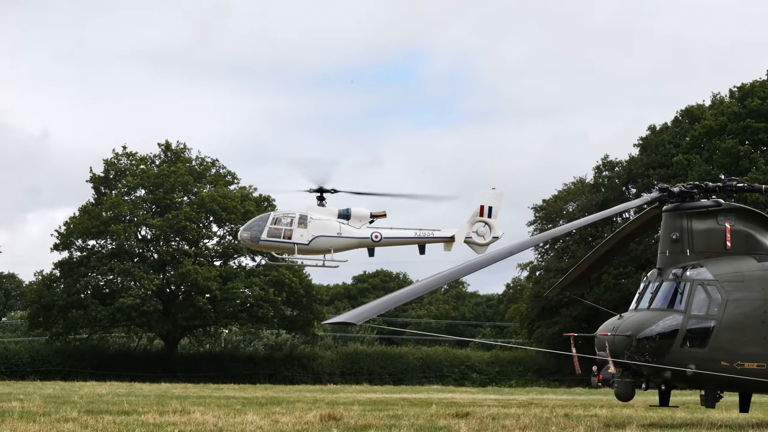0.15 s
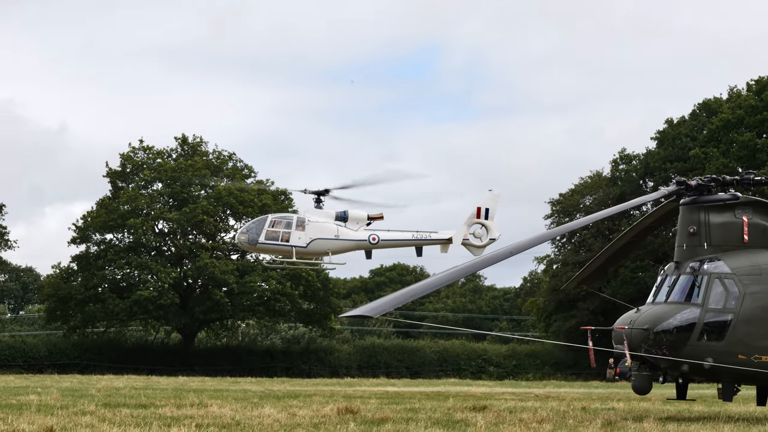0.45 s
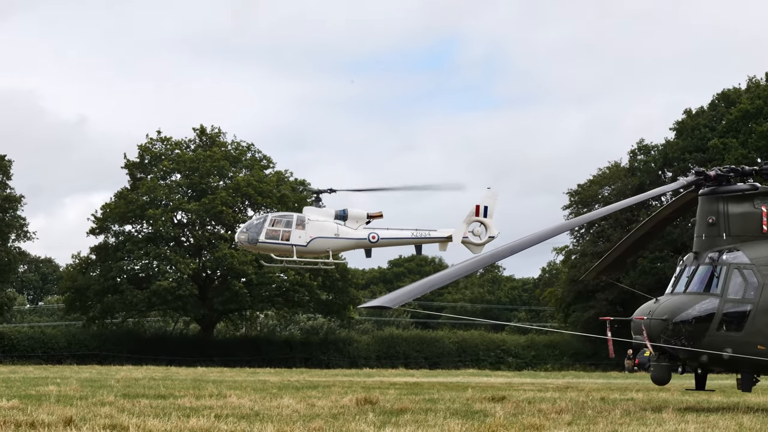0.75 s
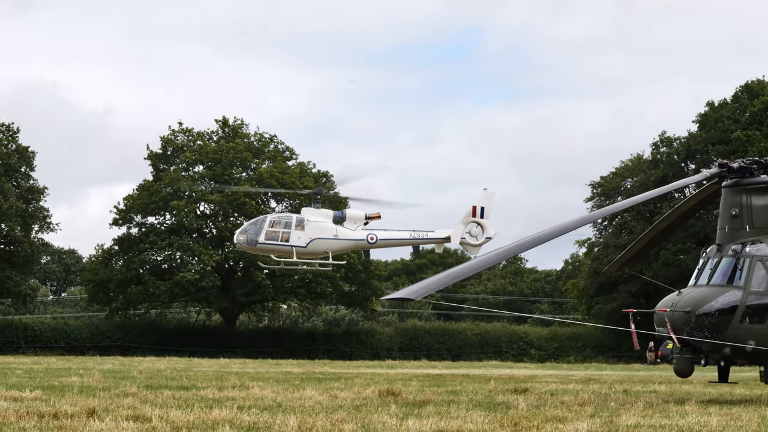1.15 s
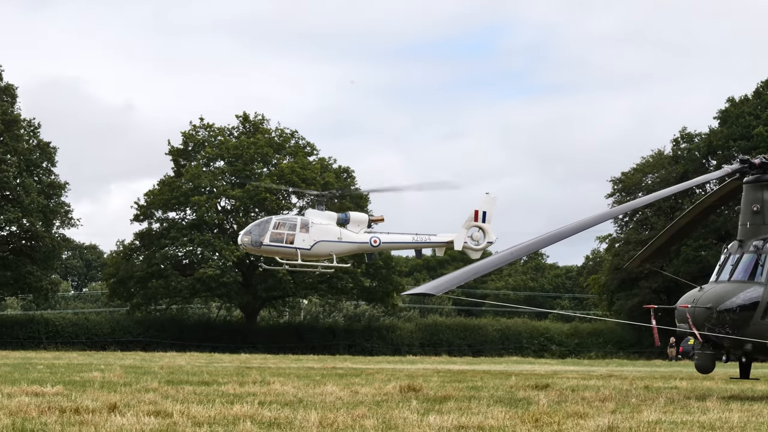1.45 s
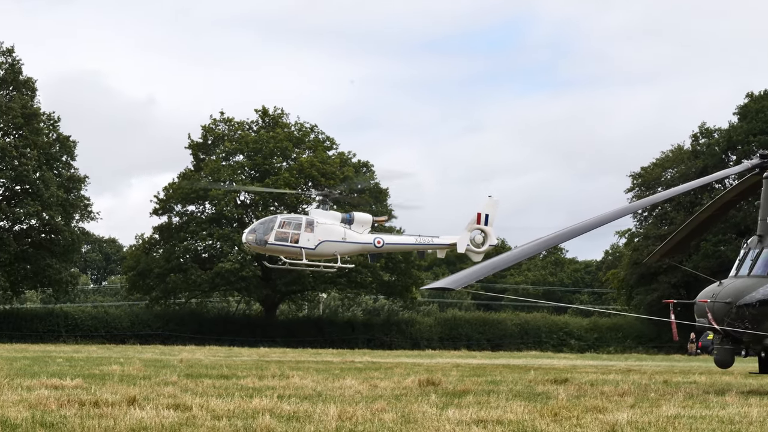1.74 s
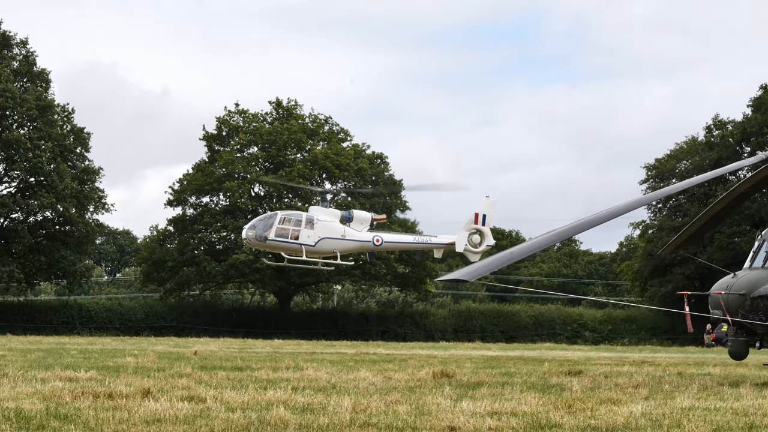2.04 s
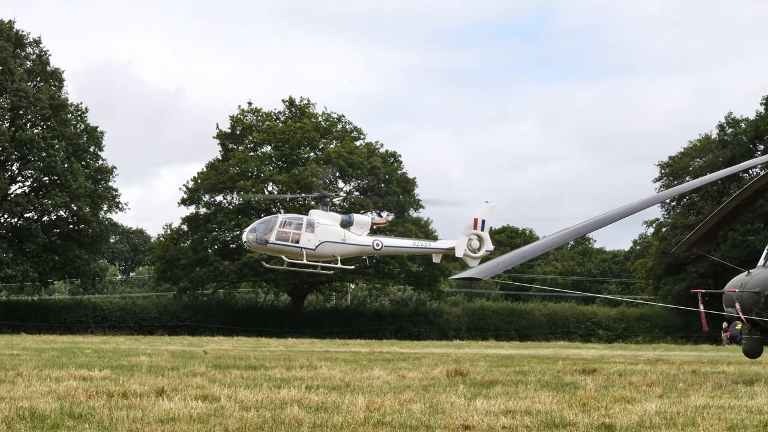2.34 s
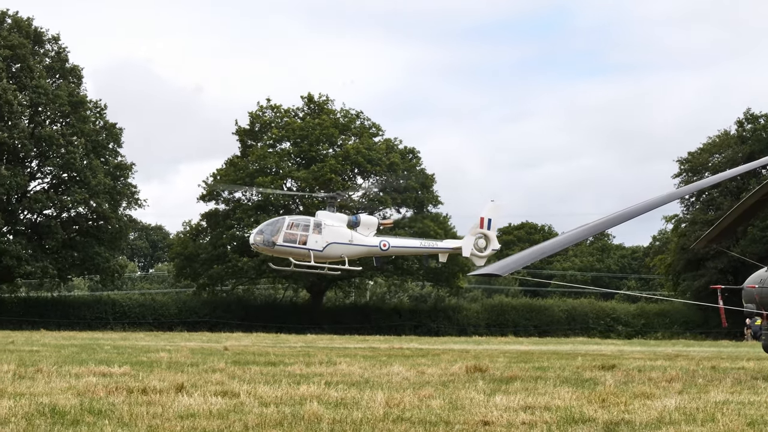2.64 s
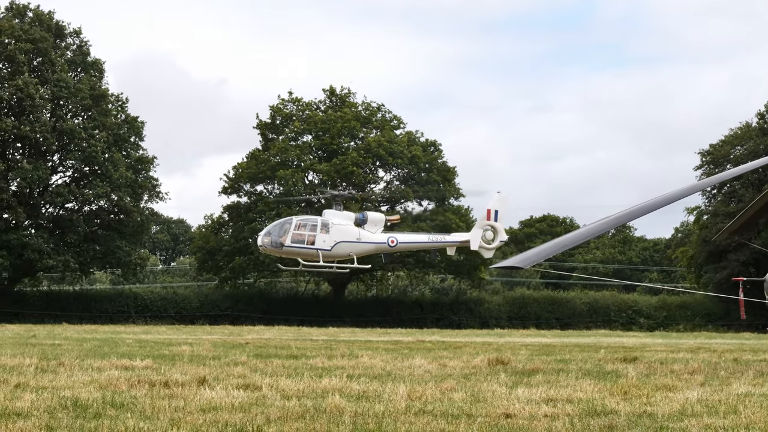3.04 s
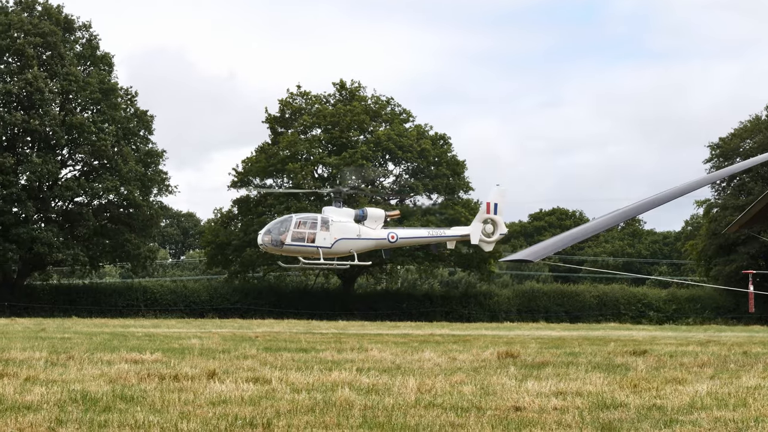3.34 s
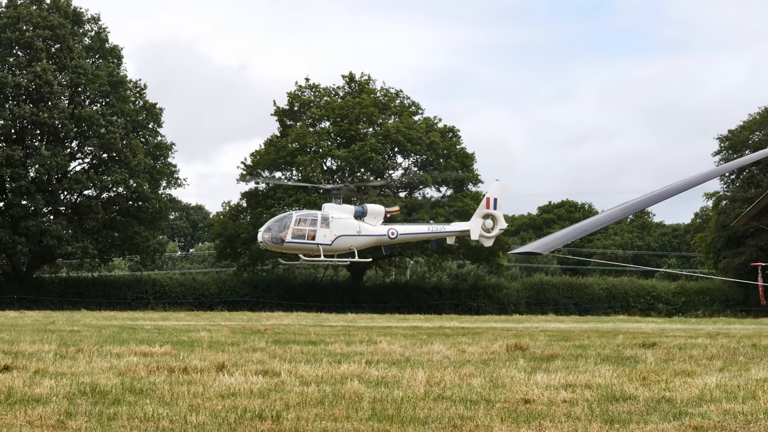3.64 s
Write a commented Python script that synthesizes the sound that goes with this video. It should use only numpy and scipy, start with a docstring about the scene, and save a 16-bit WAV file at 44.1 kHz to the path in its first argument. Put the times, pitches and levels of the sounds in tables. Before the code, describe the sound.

Outdoors, a microphone across a field hears one hovering helicopter: a few loud hollow cracks at the start, fast rotor thumping, warbling tail-fan buzz, then softer roar beneath a piercing, unsteady compressor whine.

```python
"""A ducted tail fan sings and rasps as it bites turbulent air: a light turbine helicopter, low over grass.
It drifts slowly past: exhaust roar swishes, three main blades thump, and a few hollow slaps ring out.
The compressor whines near 8 kHz, fluttering as the downwash scatters it and glinting off the blades.
Tones are sines of turning parts with random fading; roar and hiss are shaped noise; slaps are short pulses.
The microphone stands across the field; its signal is limited and loses the extreme treble."""
import sys
import numpy as np
from scipy import signal
from scipy.fft import rfft, irfft
from scipy.io import wavfile
from scipy.ndimage import uniform_filter1d, minimum_filter1d

SR = 44100
rng = np.random.default_rng(int(sys.argv[2]) if len(sys.argv) > 2 else 0)


def master(y):
    """Save y as 16-bit WAV."""
    cut = np.clip(np.atleast_2d(y).T, -1, 1)
    pcm = np.round(cut * 32767)  # scale
    wavfile.write(sys.argv[1], SR, pcm.astype(np.int16))


N = 167139
TIME = np.arange(N) / SR
BLADE_HZ, FIRST_BLADE_S = 18.82, .0135  # main blades passing, and the first passage


def from_db(db):
    """Decibels to amplitude gain."""
    return 10 ** (np.asarray(db) / 20)


def rms_one(x):
    """Scale to unit power."""
    return x / np.sqrt(np.mean(np.abs(x) ** 2) + 1e-20)


def in_time(rows):
    """Each column of a curve, interpolated at every sample."""
    s, *columns = np.transpose(rows)
    return [np.interp(TIME, s, c) for c in columns]


def turning(hz):
    """Phase angle of something that turns at a changing rate."""
    return 2 * np.pi * np.cumsum(hz) / SR


def coloured(gain_at):
    """Unit-power noise whose spectrum follows a gain function of frequency."""
    spectrum = rfft(rng.standard_normal(4 * SR))
    hz = np.arange(2 * SR + 1) / 4  # four seconds of noise: bins 1/4 Hz apart
    return rms_one(irfft(spectrum * gain_at(hz))[:N])


def noise(spectrum):
    """Unit-power noise with a tabled spectrum, interpolated over log frequency."""
    hz, db = np.transpose(spectrum)
    return coloured(lambda f: from_db(np.interp(np.log(f + 1), np.log(hz), db)))


def drift(rate_hz):
    """Random wander of unit power, mostly slower than the given rate."""
    return coloured(lambda f: 1 / (1 + (f / rate_hz) ** 2))


def scatter(rate_hz):
    """Random strength and phase of a tone that has crossed turbulent air."""
    return rms_one(drift(rate_hz) + 1j * drift(rate_hz))


def tone(angle, strength):
    """A sine of unit power, times a strength that may shift its phase too."""
    return np.sqrt(2) * np.real(strength * np.exp(1j * angle))


def fading(share, rate_hz):
    """A direct path mixed with a power share of scattered sound."""
    share = np.clip(share, 0, 1)
    return np.sqrt(1 - share) + np.sqrt(share) * scatter(rate_hz)


def since_blade(lag_s):
    """Signed time in seconds from the nearest blade passage, delayed by a lag."""
    turns = (TIME - FIRST_BLADE_S - lag_s) * BLADE_HZ
    return ((turns + .5) % 1 - .5) / BLADE_HZ


def chop(lag_s, width_s, depth):
    """A swell at each blade passage, randomly uneven; unit power."""
    uneven = from_db(3.2 * drift(12))
    swell = np.exp(-.5 * (since_blade(lag_s) / width_s) ** 2)
    return rms_one(1 + depth * uneven * swell)


def tail_fan():
    """Clean blade-rate harmonics, each with a rough warbling hump just below it."""
    # blade rate: t/s, f/Hz
    fan_speed = [(0, 1252), (.5, 1249), (.8, 1245), (1.3, 1246), (2.1, 1243), (2.7, 1247), (3.3, 1246),
                 (3.79, 1249)]
    # base levels: t/s, tone level/dB, rasp level/dB
    fan_levels = [(0.0, -17.5, -18), (0.07, -25, -26.5), (0.24, -21.5, -26), (0.39, -37, -26),
                  (0.53, -18, -19.5), (0.75, -14.5, -14), (0.78, -24, -14.5), (0.92, -11, -13.5),
                  (0.95, -21, -14), (1.1, -15.5, -22), (1.33, -22, -25), (1.45, -40, -26),
                  (1.48, -27.5, -23.5), (2.45, -29.5, -25.5), (2.68, -20, -24.5), (2.8, -32, -25.5),
                  (2.84, -24, -37), (3.35, -25, -31), (3.45, -30, -39), (3.55, -18.5, -37),
                  (3.77, -28, -39), (3.79, -26, -28)]
    # base level of the clean overtones, which beam differently: t/s, level/dB
    overtone_levels = [(0.0, -37), (0.05, -34), (0.23, -46), (0.85, -30.5), (1.15, -42), (1.27, -34.5),
                       (2.07, -37.5), (2.09, -42.5), (2.67, -32.5), (3.24, -49), (3.44, -30.5), (3.5, -42),
                       (3.58, -32.5), (3.68, -39), (3.74, -31), (3.79, -41)]
    # offsets of each harmonic: multiple of the blade rate, tone level/dB, rasp level/dB
    fan_harmonics = [(1, 2, -0.5), (2, 2, -13), (3, -0.5, -13.5), (4, -8, -13), (5, -22, -20.5)]
    rasp_hz, rasp_width_hz, rasp_warble_hz = 1195, 50, 21.93  # the width grows with the harmonic
    angle = turning(in_time(fan_speed)[0]) + 0.37 * drift(8)
    tone_db, rasp_db = in_time(fan_levels)
    overtone_db, = in_time(overtone_levels)
    rasp_angle = turning(rasp_hz + rasp_warble_hz * drift(45.03))
    out = 0
    for k, clean_db, rough_db in fan_harmonics:
        k = round(k)
        level = tone_db if k == 1 else overtone_db
        clean = tone(k * angle, fading(share=0.12 * k, rate_hz=28))
        rasp = tone(k * rasp_angle, scatter(rasp_width_hz * np.sqrt(k)))
        out = out + from_db(level + clean_db) * clean
        out = out + from_db(rasp_db + rough_db) * rasp
    return out


def roar():
    """Exhaust, rotor wash and the whine's noisy skirt: three noise bands that swish with the blades."""
    # rise and fall of each band, centred on its mean below: t/s, level/dB
    low_curve = [(0, -20.5), (.4, -22), (.9, -20), (1.35, -22), (2.1, -23.5), (2.7, -24), (3.0, -27),
                 (3.79, -28)]
    middle_curve = [(0.0, -31.5), (0.5, -31), (0.64, -26.5), (1.16, -23.5), (1.27, -27), (2.75, -27.5),
                    (2.8, -30.5), (3.77, -29), (3.79, -27)]
    hiss_curve = [(0.0, -36), (0.01, -42), (0.37, -41.5), (0.91, -33), (1.0, -41), (1.95, -34),
                  (2.0, -37.5), (3.79, -39.5)]
    # spectral shape of each noise band; the hiss's bump near 8 kHz is the compressor whine's
    # noisy skirt: f/Hz, density level/dB
    low_spectrum = [(35, -24), (70, -8), (110, -9.5), (160, -8), (260, -7.5), (375, -2.5), (430, -5.5),
                    (520, 2.5), (620, 1.5), (780, 1), (1000, -1.2), (1250, -7), (1700, -22), (3000, -45)]
    middle_spectrum = [(700, -17), (1100, -5), (1350, -0.5), (1650, -2), (2100, -7.5), (2850, -11.5),
                       (3500, -13), (5000, -16), (8000, -39)]
    hiss_spectrum = [(1800, 1.5), (3000, -8.5), (3600, 6.5), (4400, -0.5), (5300, 1.5), (6100, 2.5),
                     (6800, -3.5), (7700, 6), (8400, 6.5), (9200, -4), (10000, -5), (11000, -16),
                     (12500, -12.5), (15500, -27)]
    low_db, middle_db, hiss_db = -23, -25.5, -27  # mean levels
    low_swing, middle_swing, hiss_swing = (
        curve - curve.mean() for curve in (in_time(rows)[0] for rows in (low_curve, middle_curve, hiss_curve)))
    low = noise(low_spectrum) * chop(lag_s=0.00057, width_s=0.0023, depth=0.69)
    middle = noise(middle_spectrum) * chop(lag_s=0, width_s=0.014, depth=0.34)
    hiss = noise(hiss_spectrum) * chop(lag_s=0.0094, width_s=0.002, depth=0.44)
    hiss_flicker_db = 2.0 * drift(34)
    return (from_db(low_db + low_swing) * low
            + from_db(middle_db + middle_swing) * middle
            + from_db(hiss_db + hiss_swing + hiss_flicker_db) * hiss)


def main_rotor():
    """Each blade sends a push and then a pull of pressure, built from blade-rate harmonics."""
    # thump before its offset and wander: t/s, level/dB
    thump_curve = [(0.0, -35), (1.83, -37), (2.07, -46), (2.12, -39), (3.64, -38.5), (3.79, -39)]
    # relative strength of the harmonics: multiple of the blade rate, level/dB
    thump_orders = [(2, -0.5), (3, 5), (4, -7.5), (5, -1), (6, 2.5), (7, -13), (8, -6), (9, -20), (10, -13)]
    thump_offset_db, thump_lag_s = -1.5, -0.0013
    angle = 2 * np.pi * BLADE_HZ * since_blade(thump_lag_s)
    pulses = sum(-from_db(db) * np.sin(round(k) * angle) for k, db in thump_orders)
    wander_db = 1.1 * drift(6)
    return from_db(in_time(thump_curve)[0] + thump_offset_db + wander_db) * rms_one(pulses)


def slaps():
    """Short hollow cracks as the rotor meets its own wake, doubled by the ground."""
    # each slap, its envelope peak ahead of the low cut: t/s, level/dB
    slap_times = [(.0698, -4), (.1222, -9), (.174, -16), (2.141, -18)]
    slap_hz, slap_width_hz, ground_delay_s = 620, 430, 0.00323
    out = 0
    for s, db in slap_times:
        for lag, gain in ((0, 1), (ground_delay_s, .7)):
            age = np.maximum(TIME - s - lag, 0)
            decay = np.pi * slap_width_hz * age
            envelope = decay * np.exp(1 - decay)  # peaks at 1
            out = out - gain * from_db(db) * np.sin(2 * np.pi * slap_hz * age) * envelope
    return out


def turbine():
    """Compressor blade tone with a rotor-chopped hissing skirt, weaker shaft tones and gears."""
    # shaft speed: t/s, f/Hz
    shaft_speed = [(0, 726.2), (.45, 725.8), (.75, 724.6), (1.12, 721.9), (1.6, 723.6), (2.35, 722.6),
                   (2.9, 723.9), (3.4, 722.6), (3.79, 724.2)]
    # compressor whine before its offset: t/s, level/dB
    whine_curve = [(0.0, -29.5), (0.28, -17.5), (0.34, -27), (0.75, -15), (0.82, -20), (1.2, -14.5),
                   (1.23, -19), (1.92, -13.5), (2.09, -22), (2.13, -11), (2.24, -22.5), (2.35, -7),
                   (2.37, -6), (2.63, -17), (2.81, -6), (2.86, -17), (2.88, -6.5), (2.98, -24.5),
                   (3.02, -9), (3.19, -13.5), (3.22, -3), (3.25, -14), (3.47, -16), (3.55, -9.5),
                   (3.6, -19), (3.72, -16), (3.75, -14), (3.79, -14)]
    # shaft tones about the whine's trend: multiple of the shaft speed, level/dB
    shaft_tones = [(1, -39.5), (3, -45.5), (4, -50.5), (6, -48), (7, -51), (8, -44), (9, -49), (10, -45),
                   (12, -52), (13, -50), (14, -54), (16, -46.5), (19, -68)]
    # gearbox tones: f/Hz, level/dB
    gear_tones = [(999.6, -41), (1821, -40), (3173, -45)]
    compressor_blades = 11
    whine_offset_db, skirt_db = 1.42, -11  # the skirt is set against the whine's trend
    skirt_width_hz, skirt_shift_hz = 200, 120.8
    angle = turning(in_time(shaft_speed)[0])
    level, = in_time(whine_curve)
    trend = uniform_filter1d(level, size=20000)
    blade_angle = compressor_blades * angle

    # even out the slow swings of the flutter: the level curve holds those
    flutter = fading(share=0.69, rate_hz=44)
    flutter = flutter / np.sqrt(uniform_filter1d(np.abs(flutter) ** 2, size=3500))
    whine = from_db(level + whine_offset_db) * tone(blade_angle, flutter)

    skirt_angle = blade_angle + 2 * np.pi * skirt_shift_hz * TIME
    skirt = tone(skirt_angle, scatter(skirt_width_hz))
    skirt = from_db(skirt_db) * chop(lag_s=0.014, width_s=0.016, depth=0.43) * skirt
    shaft = sum(from_db(db) * tone(round(k) * angle, fading(share=0.054 * k, rate_hz=3 * k))
                for k, db in shaft_tones)
    gears = sum(from_db(db) * tone(2 * np.pi * hz * TIME, fading(share=0.78, rate_hz=7))
                for hz, db in gear_tones)
    around_whine = from_db(trend) * (skirt + blade_glints(blade_angle))
    return whine + around_whine + shaft * from_db(trend - trend.mean()) + gears


def blade_glints(blade_angle):
    """The whine glances off each passing blade as a falling Doppler chirp: approach, then recede."""
    glint_db, glint_lag_s, glint_width_s = -12.5, 0.014, 0.0049
    fall_hz, fall_s = 995, .0085
    aim_s, aim_width_s, aim_peak_db = 1.45, 0.19, 9.5  # when the rotor is best angled for it
    age = since_blade(glint_lag_s)
    shift_hz = fall_hz * (np.exp(np.minimum(-age / fall_s, 1.4)) - 1)
    aim_db = aim_peak_db * np.exp(-.5 * ((TIME - aim_s) / aim_width_s) ** 2)
    swell = np.exp(-.5 * (age / glint_width_s) ** 2) * from_db(glint_db + aim_db)
    return swell * tone(blade_angle + turning(shift_hz), fading(share=1.0, rate_hz=180))


def scene():
    """The whole helicopter, heard from across the field."""
    low_cut = signal.butter(2, 45, "high", fs=SR, output="sos")  # 45 Hz
    wash = signal.sosfilt(low_cut, roar() + slaps())
    return (tail_fan() + wash + main_rotor() + turbine())[None]


def record(dry):
    """A fast limiter holds the loudest peaks, what is left overloads; the top is cut."""
    limit, cutoff_hz = .97, 15700
    allowed = np.minimum(1, limit / (np.abs(dry) + 1e-9))
    gain = uniform_filter1d(minimum_filter1d(allowed, size=21), size=45)
    top_cut = signal.ellip(10, .1, 70, cutoff_hz, fs=SR, output="sos")
    return signal.sosfilt(top_cut, np.clip(dry * gain, -1, 1))


dry = scene()
out = record(dry)
master(out)
```